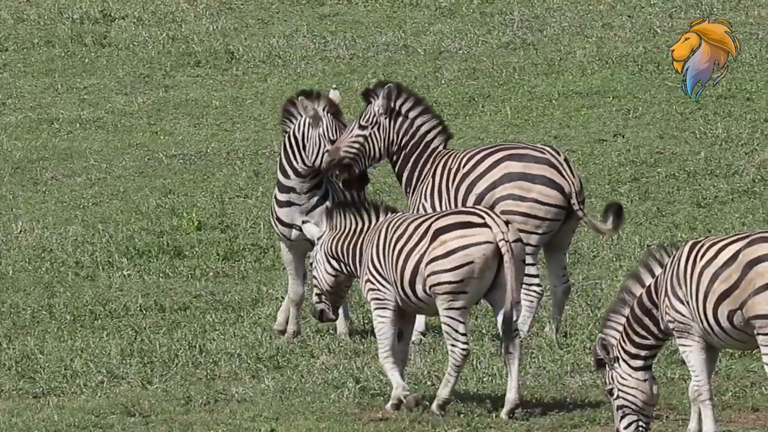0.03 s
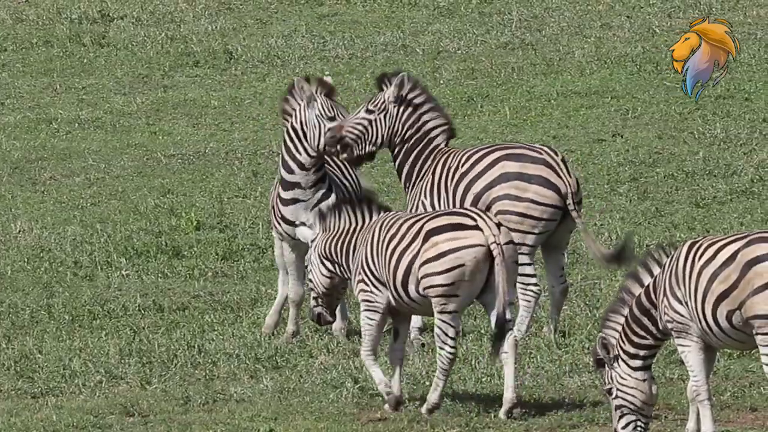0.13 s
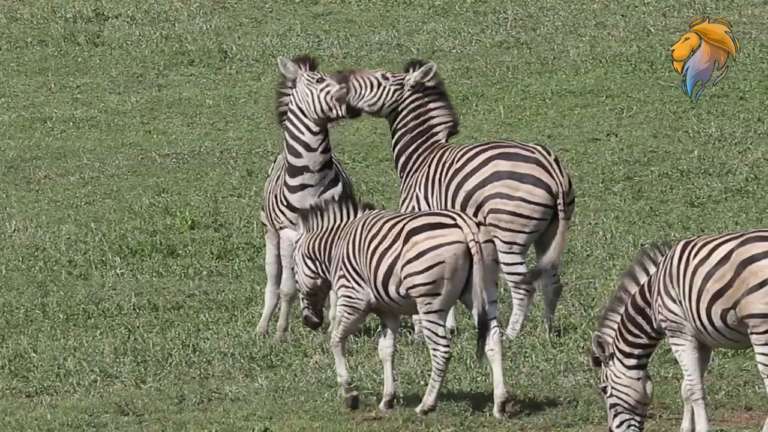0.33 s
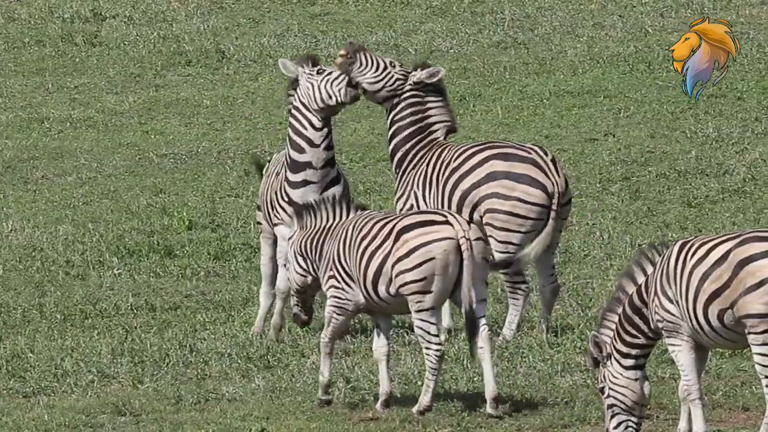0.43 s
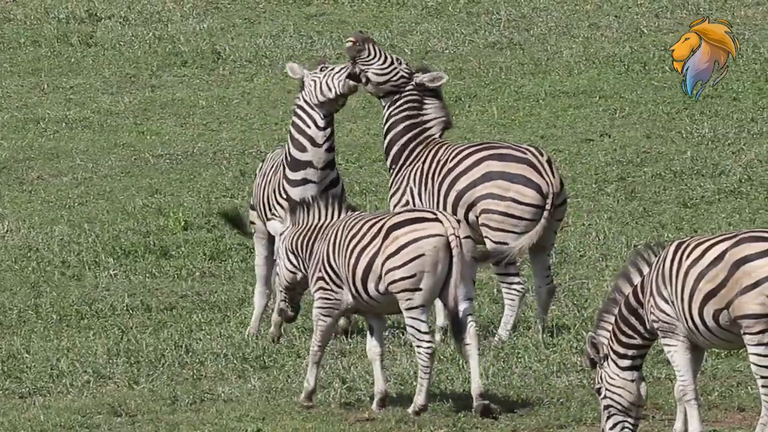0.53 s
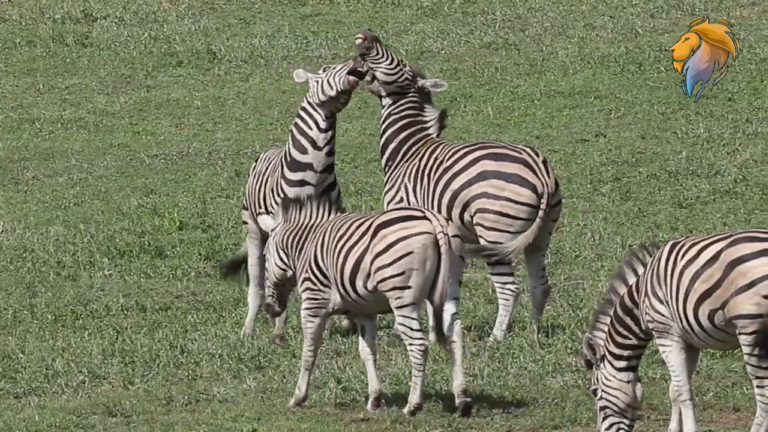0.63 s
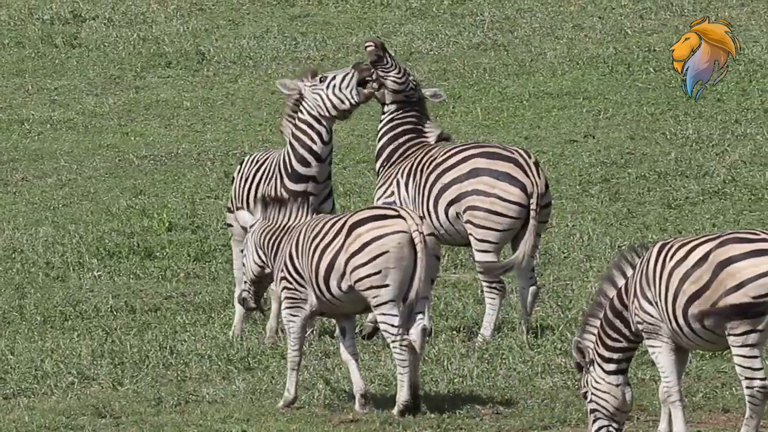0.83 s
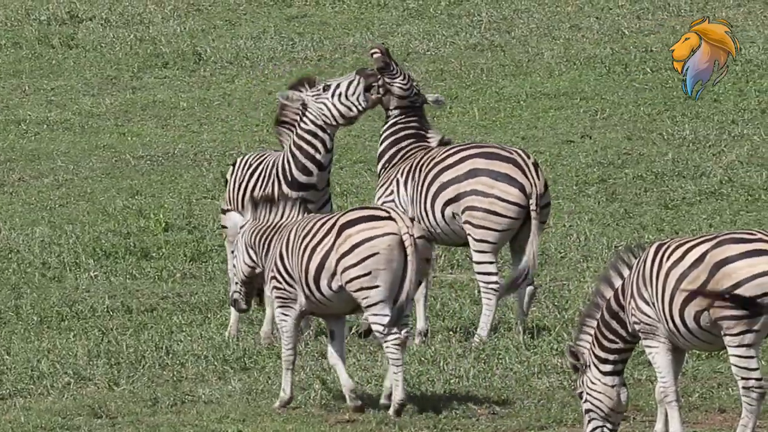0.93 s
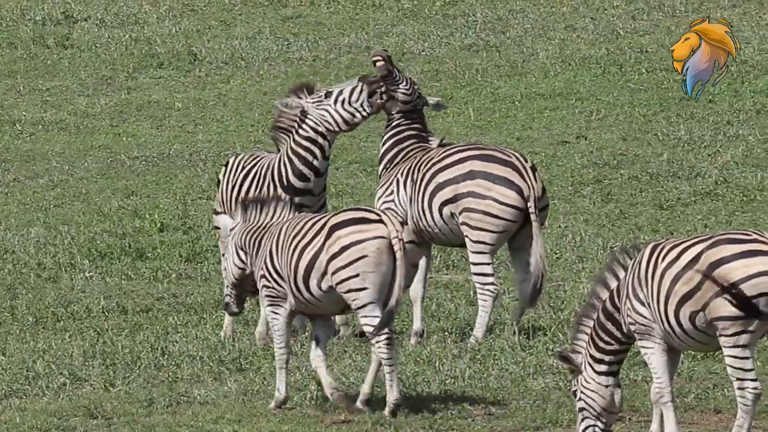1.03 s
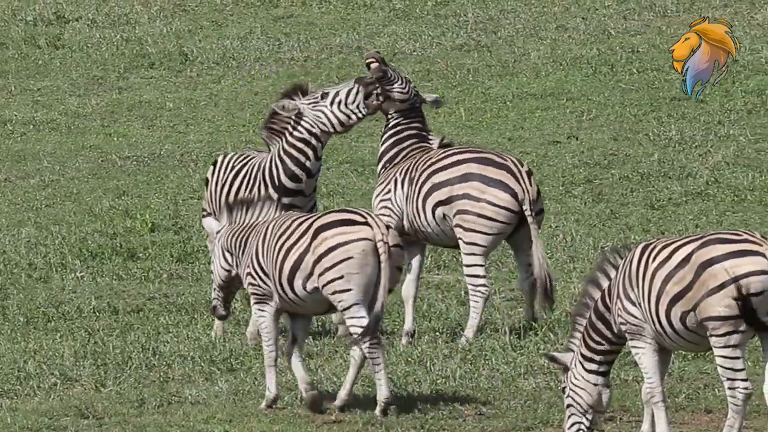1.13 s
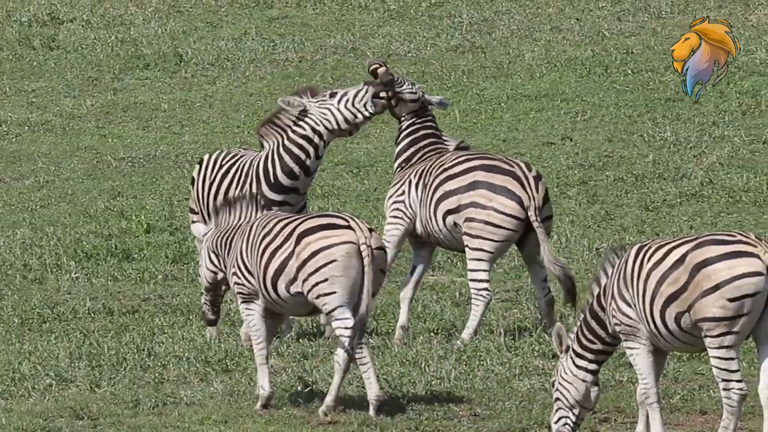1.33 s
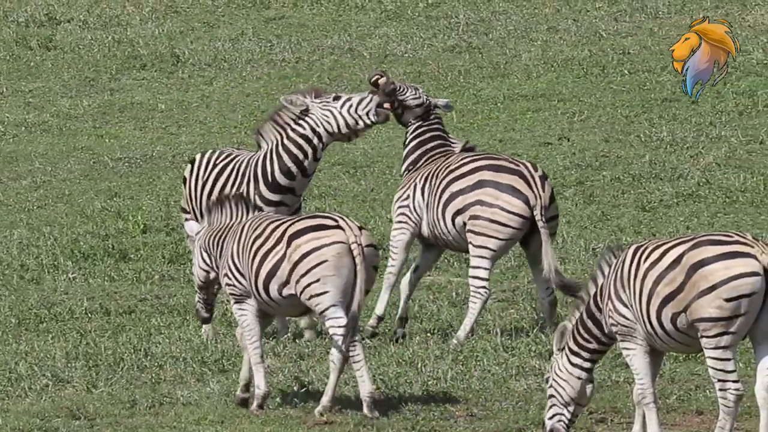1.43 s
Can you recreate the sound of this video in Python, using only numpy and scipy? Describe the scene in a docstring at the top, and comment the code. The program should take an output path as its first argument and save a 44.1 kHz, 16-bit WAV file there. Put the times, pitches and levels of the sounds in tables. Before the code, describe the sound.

A loud bird near the centre repeats a quick fluty phrase: two low notes, a rising whistle, a steep downward sweep. A quieter zebra barks three times on the left, while light wind rumbles on the microphone in open grassland.

```python
"""Open grassland, a stereo microphone in a light wind. Off to the left a zebra barks three times:
a squeak, then a rasp shaped by throat and mouth that clears into a falling voiced tone. Near the
centre a louder bird repeats a fluty phrase on the almost pure tone of its syrinx: two low slurs,
a rising whistle, a steep downward sweep. Trees scatter the calls back, small birds chirp far away,
the grass rustles and the wind rumbles on the microphone."""
import sys
import numpy as np
from scipy import signal
from scipy.fft import rfft, irfft
from scipy.io import wavfile
from scipy.ndimage import uniform_filter1d

SR = 44100
rng = np.random.default_rng(int(sys.argv[2]) if len(sys.argv) > 2 else 0)


def transcribe(signal):
    """Save signal, clipped to [-1, 1], as a 16-bit WAV file at the path in sys.argv[1]."""
    frames = np.atleast_2d(signal).T
    limited = np.clip(frames, -1, 1)
    pcm = np.round(limited * 32767).astype(np.int16)
    wavfile.write(sys.argv[1], SR, pcm)


N = 66150
LEAD_IN_S = 0.2  # calls begun before t = 0 still ring into the opening
SIZE = N + int(LEAD_IN_S * SR)
SAG_S, SLUR_SAG_HZ, SWEEP_SAG_HZ = 0.012, 70.5, 199.7  # the bird's pitch gives way as a note ends


def undb(db):
    """Decibels to gain."""
    return 10 ** (np.asarray(db) / 20)


def pan(db):
    """Channel gains that put the left db above the right."""
    return undb(np.array([[db], [-db]]) / 2)


def response(points, hz):
    """Gain of an (f/Hz, level/dB) curve at the given frequencies."""
    f, db = np.array(points).T
    return undb(np.interp(np.log(np.maximum(hz, 1)), np.log(f), db))


def colour(x, points):
    """Filter by an (f/Hz, level/dB) curve that falls steeply outside its ends."""
    f = np.arange(SIZE + 1) * SR / (2 * SIZE)
    skirts = 1 / (1 + (f / points[-1][0]) ** 12) / (1 + (points[0][0] / (f + 1)) ** 4)
    return irfft(rfft(x, 2 * SIZE) * response(points, f) * skirts)[:SIZE]


def stereo_noise(points, shared):
    """Unit noise with the given spectrum; a share of its power is common to both channels."""
    noises = [colour(rng.standard_normal(SIZE), points) for _ in range(3)]
    both, left, right = [x / x.std() for x in noises]
    return np.sqrt(shared) * both + np.sqrt(1 - shared) * np.array([left, right])


def walk(rate):
    """Smooth random wander of unit spread, at rate steps a second."""
    hold = max(int(SR / rate), 1)
    steps = np.repeat(rng.standard_normal(SIZE // hold + 1), hold)
    x = uniform_filter1d(uniform_filter1d(steps, hold), hold)[:SIZE]
    return x / x.std()


def gate(t, length, attack, release):
    """Rounded attack, hold and release, in seconds."""
    rise = np.sin(np.pi / 2 * np.clip(t / attack, 0, 1))
    fall = np.sin(np.pi / 2 * np.clip((length - t) / release, 0, 1))
    return rise * fall


def turn(hz):
    """Phase of a moving pitch."""
    return 2 * np.pi * np.cumsum(hz) / SR


def delay(x, seconds):
    """The sound shifted later in time."""
    return np.interp(np.arange(SIZE) - seconds * SR, np.arange(SIZE), x, left=0)


def spaced(x, lag_s):
    """The sound in both channels, reaching the right one later."""
    return np.array([x, delay(x, lag_s)])


def zebra(t):
    """Barks from the left: a harsh burst from the throat clears into a falling voiced tone."""
    # barks: t/s, length/s, starting f/Hz, level/dB
    barks = [(0.184, 0.14, 474.9, -27.5), (.663, 0.13, 471.6, -27.5), (1.137, 0.13, 472.9, -27)]
    # harmonics of the voice, from the fundamental up: level/dB
    harmonics = [-20, -4, -19.5, -27.5, -25.5, -27]
    # resonances of throat and mouth, shaping the rasp: f/Hz, level/dB
    throat = [(300, -40.5), (560, -31.5), (650, -19), (730, -1.5), (930, 0), (1080, -2), (1220, -26.5),
              (1420, -12), (1800, -13.5), (2300, -15.5), (2800, -20.5), (3600, -26.5), (4600, -46.5),
              (8000, -51.5)]
    sag_hz_per_s, rasp_fade_db_per_s = 930, 85.5
    harsh_s, voice_rise_s, squeak_lead_s = 0.038, 0.04, 0.036
    voice = np.zeros(SIZE)
    for start, length, hz, db in barks:
        age = np.clip(t - start, 0, length)
        jitter = 0.01 + 0.07 * np.exp(-age / harsh_s)
        phase = turn((hz - sag_hz_per_s * age) * (1 + jitter * walk(400)))
        tone = sum(undb(level) * np.sin(k * phase) for k, level in enumerate(harmonics, 1))
        tone *= np.minimum(age / voice_rise_s, 1)
        breath = rng.standard_normal(SIZE) * (1 + 0.39 * np.cos(phase))  # pulses with the voice
        rasp = colour(breath, throat)
        rasp = rasp / rasp.std() * undb(-3 - rasp_fade_db_per_s * age)
        bark = (tone + rasp) * gate(age, length, attack=0.021, release=0.07)
        voice += undb(db) * (bark + undb(-17.5) * squeak(t - start + squeak_lead_s))
    return pan(14.5) * spaced(voice, lag_s=0.00048) + undb(-10) * scatter(voice, t60=0.56, shared=0.18)


def squeak(age, length=0.04):
    """The short, unsteady arch of pitch that leads into a bark."""
    hz = np.interp(age, [0, length / 2, length], [648, 735, 630]) * (1 + 0.042 * walk(400))
    return np.sin(turn(hz)) * gate(age, length, attack=0.017, release=0.014)


def bird(t):
    """The loud bird near the centre: its direct song, then the returns from near and far trees."""
    # echoes off nearby trees: delay/s, level/dB, right channel's lag/s
    trees = [(0.0111, -12.5, -0.01), (0.02, -17.5, -0.0088), (.031, -24, -0.036)]
    # colour of the long echo: f/Hz, level/dB
    far_colour = [(1300, -4.5), (1800, 5.5), (2350, 1.5), (3000, -3)]
    low = slurs(t)
    tone, overtones = whistles(t)
    falls = sweeps(t)
    song = low + tone + falls
    direct = low + falls + spaced(tone, lag_s=47e-6)
    echoes = sum(undb(db) * np.array([delay(song, late), delay(song, late + lag)])
                 for late, db, lag in trees)
    near = (undb(-9) * scatter(tone, t60=0.26, shared=0.25)
            + undb(-11.5) * scatter(low, t60=0.26, shared=1)
            + undb(-6.5) * scatter(falls, t60=0.15, shared=0.7))
    far = undb(-17) * scatter(colour(song, far_colour), t60=0.67, shared=0.3)
    sheen = spaced(overtones, lag_s=14e-6) + undb(-0.5) * scatter(overtones, t60=0.26, shared=0.26)
    return pan(1) * direct + echoes + near + far + pan(2.8) * sheen


def syrinx(hz):
    """The bird's voice: a pure tone that wavers slightly in pitch and flutters in strength."""
    tone = np.sin(turn(hz * (1 + 0.0035 * walk(250))))
    return tone * undb(0.27 * walk(200) + 0.45 * walk(1100))


def whistles(t):
    """Loud rising notes: their pure tone and their raspy overtones."""
    # one curve for each whistle: t/s, f/Hz, level/dB
    curves = [
        [(-.09, 2105, -29), (-.06, 2240, -15), (-.02, 2380, -28)],
        [(.299, 2030, -40.5), (.305, 1990, -26), (.317, 2060, -24), (.331, 2180, -9.5), (.350, 2280, -17),
         (.368, 2400, -13.5), (.379, 2420, -31)],
        [(.687, 2110, -38.5), (.694, 2120, -14.5), (.706, 2170, -8.5), (.721, 2290, -9), (.742, 2390, -10.5),
         (.757, 2459, -15), (.766, 2440, -35.5)],
        [(1.078, 2150, -39), (1.084, 2155, -12.5), (1.096, 2200, -8.5), (1.116, 2285, -10), (1.139, 2410, -12),
         (1.150, 2474, -16.5), (1.158, 2512, -30)],
    ]
    # overtone strength by where it falls: f/Hz, level/dB re the fundamental
    timbre = [(4000, -54.5), (4800, -36.5), (5600, -50), (6400, -41), (6900, -31.5), (7200, -24),
              (7500, -43), (8200, -60.5), (9500, -43), (10500, -68.5)]
    tone, overtones = np.zeros((2, SIZE))
    for curve in curves:
        times, hz, db = np.array(curve).T
        pitch = np.interp(t, times, hz)
        envelope = undb(np.interp(t, times, db))
        envelope *= gate(t - times[0], times[-1] - times[0], attack=0.002, release=0.001)
        phase = turn(pitch * (1 + 0.0082 * walk(900)))  # fast jitter roughens the overtones
        tone += envelope * syrinx(pitch)
        overtones += envelope * sum(response(timbre, k * pitch) * np.sin(k * phase) for k in range(2, 5))
    return tone, overtones


def sweeps(t):
    """Whip-like falls, loudest around the knee where the plunge slows."""
    # sweeps: t/s, length/s, knee f/Hz, end f/Hz before the sag, level/dB, fade past the knee/(dB/s)
    notes = [(-.013, 0.048, 1995, 1330, -22.5, 96.5), (.389, 0.045, 1927, 1282, -20.5, 111),
             (0.778, .050, 2164, 1478, -14.5, 301.5), (1.168, .053, 2135, 1424, -17, 298.5)]
    top_hz, knee_s, plunge_db = 3500, 0.01, -22.5
    out = np.zeros(SIZE)
    for start, length, knee_hz, last_hz, db, fade in notes:
        age = np.clip(t - start, 0, length)
        hz = np.interp(age, [0, knee_s, length], [top_hz, knee_hz, last_hz])
        hz -= SWEEP_SAG_HZ * np.exp((age - length) / SAG_S)
        swell_db = plunge_db * np.maximum(1 - age / knee_s, 0) - fade * np.maximum(age - knee_s, 0)
        tone = syrinx(hz * (1 + 0.012 * walk(400)))
        gain = undb(db + swell_db + 2.5 * walk(600))
        out += tone * gain * gate(age, length, attack=0.0062, release=0.019)
    return out


def slurs(t):
    """Low notes that drop quickly, then slide."""
    # slurs: t/s, length/s, start f/Hz and end f/Hz before the sag, level/dB
    notes = [(.136, 0.024, 1620, 1380, -22), (0.184, .039, 1740, 1371, -20),
             (0.533, .041, 1600, 1398, -19.5), (0.584, 0.046, 1790, 1423, -18),
             (0.932, 0.028, 1800, 1562, -17), (0.978, 0.042, 1900, 1505, -16)]
    drop_s, drop_share = 0.0057, 0.45
    out = np.zeros(SIZE)
    for start, length, first_hz, last_hz, db in notes:
        age = np.clip(t - start, 0, length)
        height = drop_share * np.exp(-age / drop_s) + (1 - drop_share) * (1 - age / length)
        hz = last_hz + (first_hz - last_hz) * height
        hz -= SLUR_SAG_HZ * np.exp((age - length) / SAG_S)
        out += syrinx(hz) * undb(db) * gate(age, length, attack=0.021, release=0.0084)
    return out


def scatter(x, t60, shared):
    """Diffuse return from trees and ground, 60 dB down in t60 seconds, partly alike in both channels."""
    t = np.arange(N) / SR
    both, own = rng.standard_normal(N), rng.standard_normal((2, N))
    tail = np.sqrt(shared) * both + np.sqrt(1 - shared) * own
    tail *= np.exp(-np.log(1000) * t / t60) * np.clip(t / 0.0025, 0, 1)
    tail /= np.sqrt(np.sum(tail ** 2, axis=1, keepdims=True))
    return signal.fftconvolve(x[None], tail, axes=1)[:, :SIZE]


def small_birds(t):
    """Thin, quick glides from far away, with almost as much scatter as direct sound."""
    # chirps: t/s, length/s, start f/Hz, end f/Hz, level/dB
    chirps = [(0, 0.037, 3960, 4800, -51), (0.074, 0.018, 4530, 3140, -56.5),
              (0.096, 0.011, 4840, 3870, -54.5), (0.414, 0.013, 5720, 3380, -55),
              (0.437, 0.018, 5310, 3750, -50), (0.508, 0.016, 4660, 3680, -55),
              (1.104, 0.0097, 4610, 3190, -41), (1.22, 0.039, 4700, 3150, -47.5),
              (1.257, 0.011, 5130, 3540, -50.5)]
    out = np.zeros(SIZE)
    for start, length, first_hz, last_hz, db in chirps:
        hz = np.interp(t - start, [0, length], [first_hz, last_hz]) * (1 + 0.013 * walk(500))
        out += undb(db) * np.sin(turn(hz)) * gate(t - start, length, length / 2, length / 2)
    return out + undb(-1.5) * scatter(out, t60=0.35, shared=0.11)


def rustles(t):
    """Brief, grainy swishes a little to the left, as of hooves in grass."""
    # swishes: t/s, length/s, level/dB
    swishes = [(0.393, 0.068, -51.5), (0.754, 0.095, -57), (1.052, 0.095, -49), (1.249, 0.033, -56)]
    # spectrum of the grass: f/Hz, level/dB
    grass = [(2800, -7.5), (4000, -3), (5100, -4), (6000, -14), (11000, -33)]
    swell = sum(undb(db) * gate(t - start, length, length / 2, length / 2)
                for start, length, db in swishes)
    return stereo_noise(grass, shared=0.21) * swell * undb(3.3 * walk(300)) * pan(2.8)


def wind(t):
    """Light wind rumbling unevenly on the microphone, with one brief gust."""
    # spectrum of the rumble: f/Hz, level/dB
    rumble = [(9, 12), (20, 6), (32, 0.5), (50, -9), (85, -10), (125, -17), (180, -19.5), (330, -32)]
    gust_at_s, gust_width_s, gust_db = 0.47, 0.075, 3.5
    swell_db = 1.53 * walk(7) + gust_db * np.exp(-((t - gust_at_s) / gust_width_s) ** 2)
    return stereo_noise(rumble, shared=0.25) * undb(-37 + swell_db) * pan(2.5)


def air():
    """The faint, nearly steady hush of the open field."""
    # spectrum of the hush: f/Hz, level/dB
    hush = [(100, -14.5), (300, 3.5), (600, -1.5), (1000, 1.5), (2000, -8.5), (3000, -10), (4500, -17.5),
            (6000, -20), (9000, -24), (20000, -21.5)]
    return stereo_noise(hush, shared=0.55) * undb(-51.5 + 0.43 * walk(4.2))


def scene():
    """At the microphone: bird, zebra, far chirps and rustles over wind and the hush of the field."""
    t = np.arange(SIZE) / SR - LEAD_IN_S
    background = wind(t) + air()
    return (bird(t) + zebra(t) + small_birds(t) + rustles(t) + background)[:, -N:]


def record(dry):
    """The recorder cuts the treble steeply above 15.8 kHz."""
    return signal.sosfilt(signal.ellip(10, 0.2, 80, 15800, fs=SR, output="sos"), dry)


dry = scene()
out = record(dry)
transcribe(out)
```